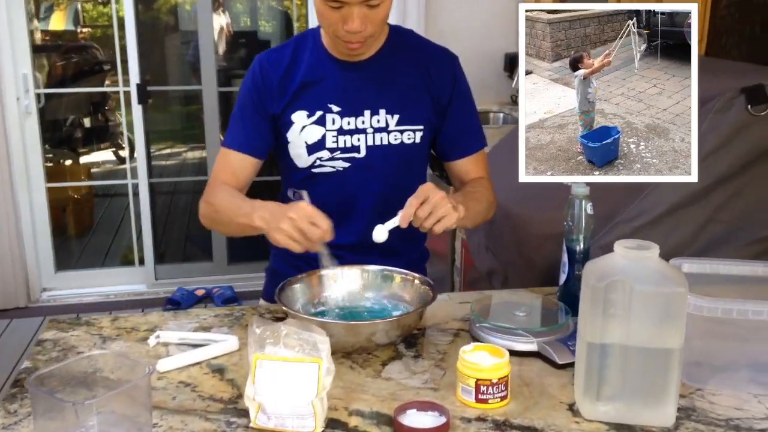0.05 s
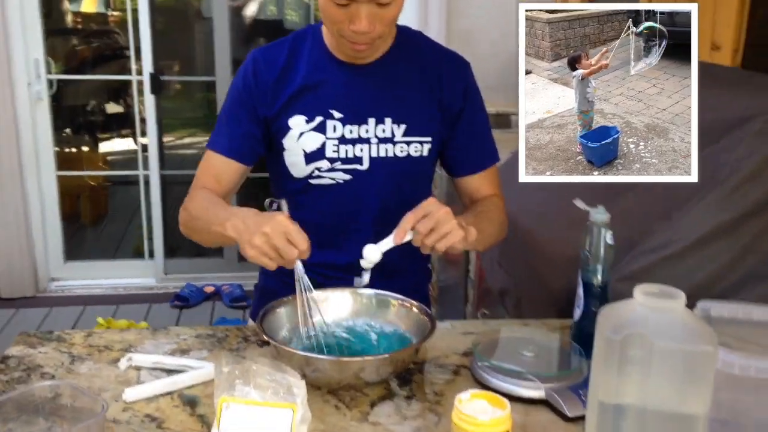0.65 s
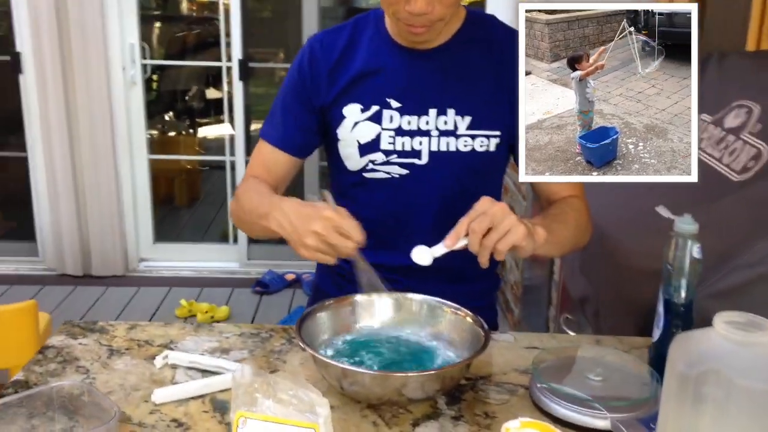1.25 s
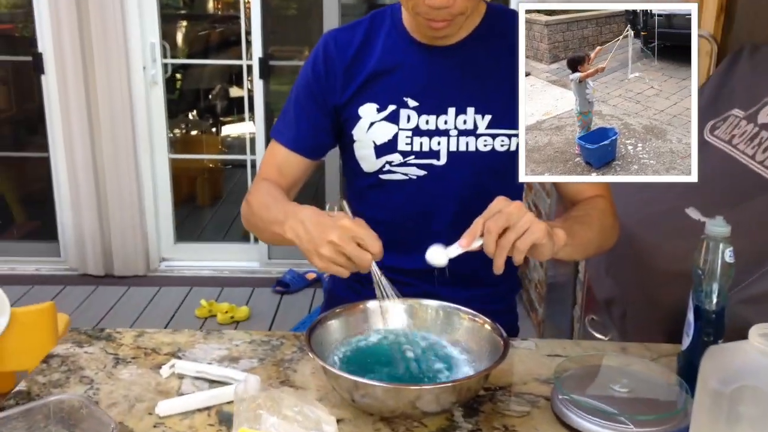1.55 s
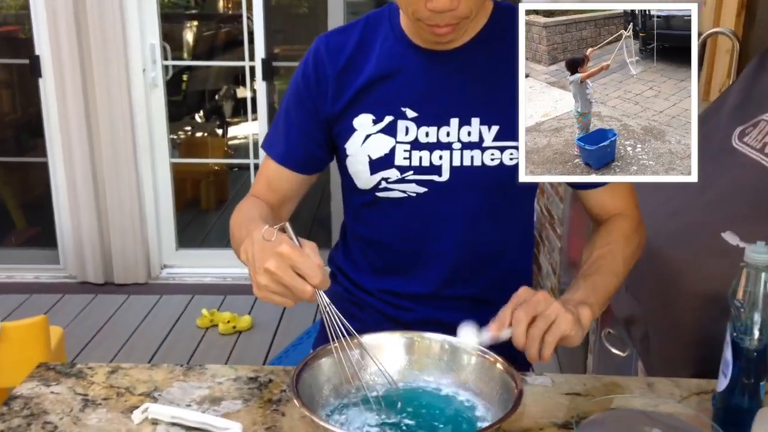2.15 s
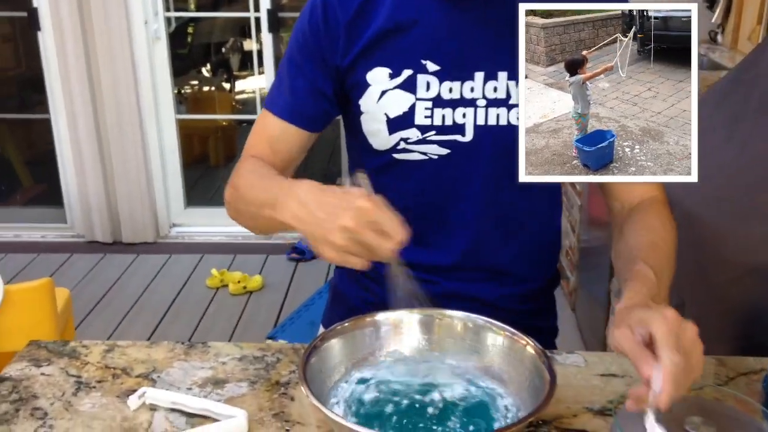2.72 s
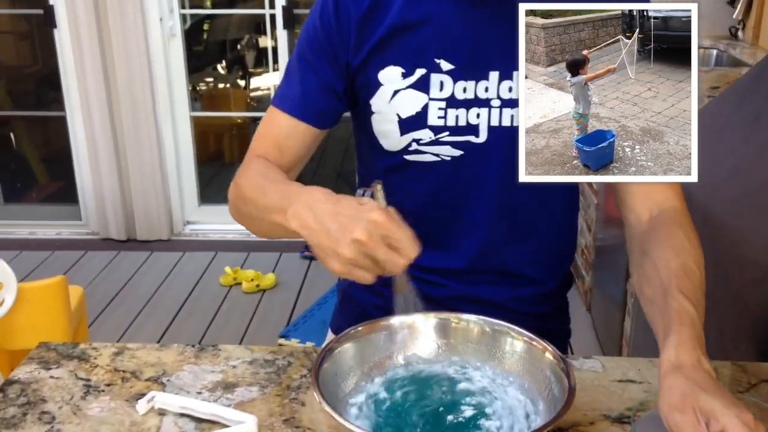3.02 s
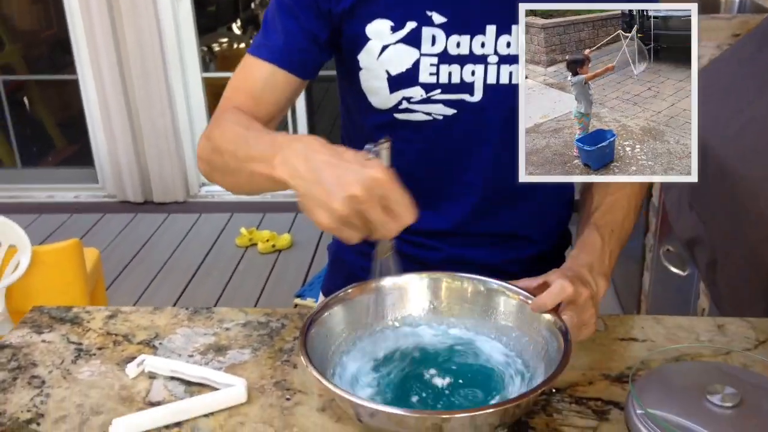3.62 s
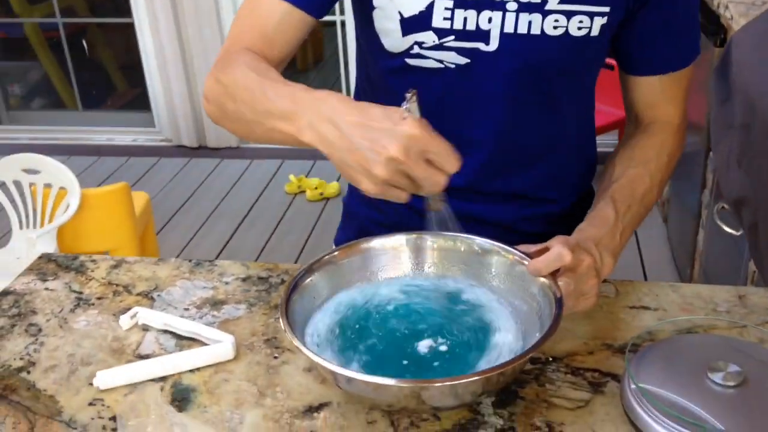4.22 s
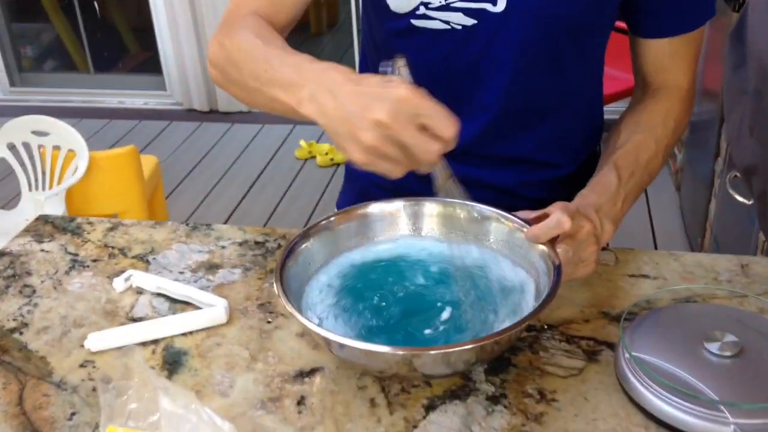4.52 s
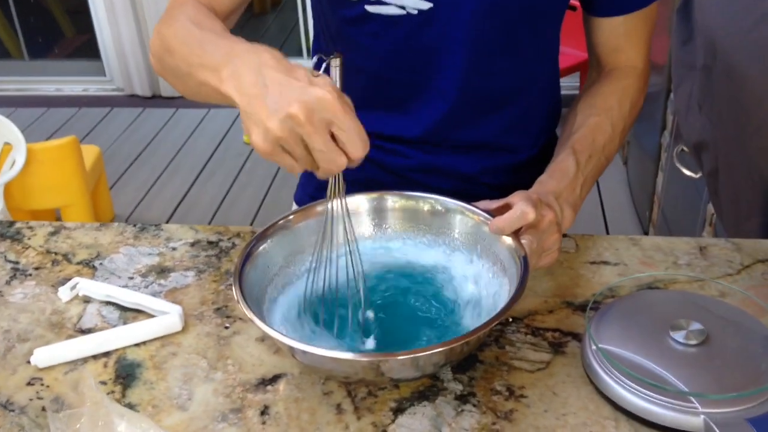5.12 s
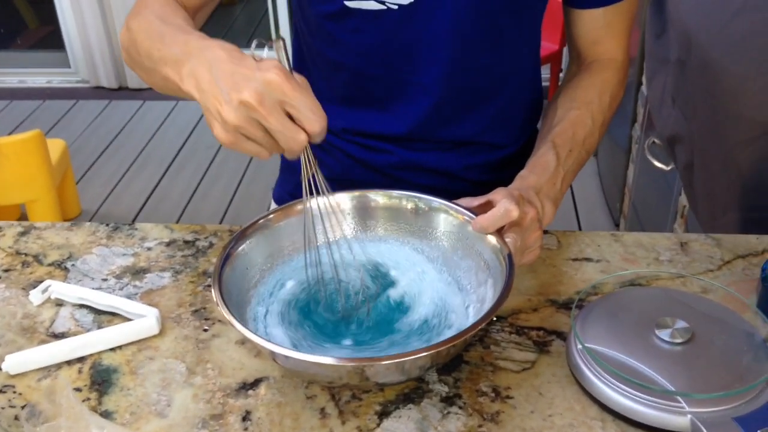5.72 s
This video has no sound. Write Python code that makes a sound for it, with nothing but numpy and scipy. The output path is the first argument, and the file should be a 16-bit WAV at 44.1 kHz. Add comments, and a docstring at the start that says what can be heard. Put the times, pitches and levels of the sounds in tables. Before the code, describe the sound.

A wire whisk beats soapy liquid in a steel bowl, clinking and gurgling, with a pause for two ringing spoon taps on the rim.

```python
"""A wire whisk beats soap solution in a steel bowl on a stone counter, by a glass door.
It turns almost four times a second; each turn makes bubbles gurgle and foam fizz, and the wires
skid over the wall about twice. In a pause a spoon is tapped twice on the rim: the bowl rings and
rocks, and powder patters in. The whisking resumes, and soon a hand steadies the bowl and dulls
its ring. A faint rumble and hiss lie behind it all."""
import sys
import numpy as np
from scipy import signal
from scipy.fft import rfft, irfft, next_fast_len
from scipy.io import wavfile

SR = 44100
rng = np.random.default_rng(int(sys.argv[2]) if len(sys.argv) > 2 else 0)


def generate_wav(signal):
    """Clip the signal to [-1, 1] and save it as 16-bit WAV at the path in sys.argv[1]."""
    frames = np.transpose(np.atleast_2d(signal))
    scaled = np.clip(frames, -1, 1) * 32767
    pcm = np.round(scaled).astype(np.int16)
    wavfile.write(sys.argv[1], SR, pcm)


N = 262836
T = np.arange(N) / SR
AGE = np.arange(SR * 2 // 5) / SR   # seconds since a blow
HOLD_S = 3.45   # from here the free hand steadies the bowl

# Levels are relative: the functions add gains of their own. t60 is the time to fade by 60 dB.
# low rumble of the surroundings: t/s, level/dB
RUMBLE_LEVEL = [(0, -55), (0.7, -55.5), (3.2, -55), (4.0, -52), (5.2, -53.5), (5.6, -56), (5.96, -53.5)]
# its tone: f/Hz, level/dB
RUMBLE_TONE = [(20, -38), (30, -50), (45, 5), (90, 0.5), (150, -3), (300, -12.5), (900, -23.5), (2500, -57),
               (5000, -47), (15000, -50)]
# high hiss of the surroundings: t/s, level/dB
HISS_LEVEL = [(0, -57), (1.0, -61.5), (2.0, -59), (2.6, -58.5), (3.5, -52.5), (4.5, -53), (5.2, -51.5),
              (5.65, -54), (5.96, -49.5)]
# its tone: f/Hz, level/dB
HISS_TONE = [(3500, -37), (5000, -6), (6100, 1), (7400, 2), (8600, 1), (10000, -12), (13000, -16),
             (16000, -34)]
# a lower hiss that comes and goes: t/s, level/dB
LOW_HISS_LEVEL = [(0, -58), (1.0, -65.5), (1.4, -59.5), (1.7, -60), (2.05, -57.5), (2.5, -52.5),
                  (2.95, -60.5), (4.0, -56.5), (5.0, -54), (5.6, -70.5), (5.96, -60)]
# its tone: f/Hz, level/dB
LOW_HISS_TONE = [(900, -5.5), (2100, 0), (2800, 3.5), (3500, 1), (4600, -2.5), (5500, -8), (9000, -39)]
# turns of the whisk through the liquid: t/s, length/s, gurgle level/dB, foam level/dB
TURNS = [(0, 0.085, -67, -51.5), (0.174, 0.17, -56, -51), (0.457, 0.17, -59, -54.5),
         (0.748, 0.095, -40.5, -53.5), (0.964, .12, -49, -55), (1.212, 0.13, -47.5, -54.5),
         (1.48, 0.087, -40, -52), (1.688, .15, -58, -57), (2.689, 0.21, -51.5, -47.5),
         (3.047, .2, -45, -53.5), (3.343, 0.19, -49.5, -49), (3.6, 0.079, -60, -56),
         (3.756, 0.17, -56, -56), (3.993, 0.23, -47, -55), (4.237, .21, -44.5, -53),
         (4.492, 0.17, -44, -52), (4.701, 0.16, -46.5, -57), (5.012, 0.14, -46, -58),
         (5.275, 0.13, -43.5, -54.5), (5.719, 0.043, -53, -67), (5.9, .06, -51, -70)]
# tone of bursting foam: f/Hz, level/dB
FOAM_TONE = [(2000, -7.5), (4500, -13), (6500, 0.5), (9000, 2), (12000, -2.5), (15500, -1.5)]
# how long the room echoes: f/Hz, t60/s
ROOM_DECAY = [(200, 0.33), (600, 0.14), (2000, 0.11), (6000, 0.2), (14000, 0.026)]
# wires hit the bowl: t/s, skid length/s, level/dB, thud/dB, brightness/dB (last two added to level)
CLINKS = [(.169, 0.014, -34.5, -6, -0.5), (.247, .008, -39.5, -8.5, 0.5), (.459, 0.015, -38, -1.5, 3.5),
          (.542, .008, -41.5, -3, -2.5), (.745, 0.014, -32, -4, -5), (0.8193, 0.0027, -35, -7.5, -1),
          (.966, .011, -40, 3, 1.5), (1.074, 0.0029, -36.5, -8, -4), (1.203, .008, -40, 1, -2),
          (1.244, .004, -41, -20, 0), (1.3, .012, -36, -7, -3.5), (1.471, 0.0064, -44.5, 6, -3),
          (1.482, 0.0056, -29.5, -5, -1), (1.55, .013, -34, -6, 2), (1.684, 0.017, -42, 1.5, 1),
          (1.829, 0.0084, -37, -10, -1), (2.67, 0.0055, -48, -11, -0.5), (2.752, 0.0035, -38.5, -13.5, -2),
          (2.8634, .002, -46, -9, 6.5), (2.878, 0.0098, -51.5, -11, 10), (3.0, 0.0049, -42.5, -6, 0.5),
          (3.081, .002, -39, -26, -1.5), (3.095, 0.014, -37, -7, 0.5), (3.2249, .002, -36.5, -6, -2.5),
          (3.3197, .0005, -35, -25, -1), (3.382, .002, -38, -29, -16), (3.418, .003, -50.5, -8, 3),
          (3.518, 0.0031, -44.5, -0.5, 9), (3.7337, 0.0051, -47, 2.5, -19), (3.7726, .002, -49, 5.5, 2),
          (3.788, 0.013, -37.5, -1, 3.5), (4.009, 0.0043, -46.5, -6, -3), (4.067, .017, -36.5, -2.5, 1.5),
          (4.256, 0.0065, -41.5, -6.5, -3), (4.33, 0.0052, -40, -3.5, -7), (4.435, .002, -48, 3.5, -6),
          (4.527, .002, -42, -5.5, -19), (4.564, 0.016, -36, -7.5, -3.5), (4.791, 0.0028, -29.5, -8.5, -7),
          (4.797, .01, -27.5, -7, 0.5), (5.024, 0.0053, -43.5, -1, -11), (5.067, 0.0081, -36.5, -7.5, -6.5),
          (5.109, .01, -45, -18, 6), (5.306, 0.0041, -38.5, -7, -19), (5.3157, 0.0044, -32.5, -4, -6.5),
          (5.743, 0.0041, -30, -12.5, -6), (5.754, .007, -36, -1, -12), (5.895, 0.0029, -29, -5.5, -12.5),
          (5.902, .001, -39.5, -8, -1)]
# tone of the wires on the free bowl: f/Hz, level/dB
FREE_TONE = [(50, -46), (140, -24), (208, -8.5), (255, -37), (295, -18), (380, -11.5), (570, -29.5),
             (690, -3.5), (830, 8), (1150, -5.5), (1950, 4.5), (2300, 1), (2750, 2), (4200, -6.5),
             (5100, -11.5), (7500, -2), (15500, -14)]
# tone of the wires on the held bowl: f/Hz, level/dB
HELD_TONE = [(50, -17), (110, -5), (380, -3.5), (520, -15.5), (850, -1.5), (1200, 0.5), (1650, -3),
             (2130, 6), (3200, -3), (4200, -4.5), (5000, -10.5), (7500, -3), (11000, -9.5), (15500, -10.5)]
# the bowl's modes, the notes it rings at: f/Hz, level/dB, t60/s when untouched
BOWL_MODES = [(207.7, -16.5, 0.77), (296.4, -12.5, 0.56), (511, -21.5, 0.39), (707, -18.5, 0.43),
              (781, -14, 0.47), (808, -15.5, 0.36), (1386, -27, 1), (1690, -19.5, 0.57), (1756, -7.5, 0.33),
              (1787, -7, 0.21), (2080, -15, 0.39), (2630, -28, 0.44), (2845, -20, 0.62), (3180, -29, 0.26),
              (3500, -26, 0.3), (4043, -20, 0.48), (5530, -16.5, 0.23), (6300, -4.5, 0.15),
              (6300, -9, 0.15), (6800, -11, 0.15), (8100, -12, 0.036), (8660, 6, 0.043)]
# tone of the free bowl's hollow boom: f/Hz, level/dB
BOOM_TONE = [(100, -32), (180, -3), (208, 5.5), (228, -13), (255, -25), (600, -55)]
# the largest single bubbles: t/s, level/dB, f/Hz
PLOPS = [(.874, -32, 2770), (1.038, -30, 3530), (1.579, -24, 2080), (2.767, -23, 2090), (3.001, -23, 2270),
         (3.098, -19, 1990), (3.17, -29, 2710), (3.253, -27, 2230), (3.892, -30.5, 2690),
         (4.332, -21.5, 2220), (4.591, -20.5, 2910), (4.756, -24.5, 2480), (4.827, -27, 636),
         (5.28, -32, 1134), (5.374, -28.5, 1485), (5.79, -27.5, 1375), (5.946, -23.5, 1280)]
# spoon taps on the rim: t/s, strike level/dB, ring level/dB
TAPS = [(2.1141, -24, -28), (2.3103, -23.5, -23.5)]
# tone of a tap: f/Hz, level/dB
SPOON_TONE = [(400, -32), (1300, -16), (2800, -3.5), (3400, -13), (4100, -3.5), (4900, -16), (6400, 0.5),
              (7600, -7), (8800, 0.5), (10600, -16.5), (14000, -8), (16000, -21)]
# the bowl's foot knocks on the counter: t/s, level/dB
KNOCKS = [(2.115, -39.5), (2.312, -36), (2.3393, -34), (2.352, -44), (2.367, -42.5), (2.394, -45),
          (2.668, -47), (3.735, -50.5), (3.79, -62), (5.745, -42.5), (5.896, -52)]
# tone of a knock: f/Hz, level/dB
KNOCK_TONE = [(25, -45), (60, -4), (95, 2.5), (200, 2), (250, -3), (330, 2.5), (520, -6), (850, -5.5),
              (1300, -13), (4000, -21.5)]
# powder falling from the spoon onto the liquid: t/s, level/dB
POWDER_LEVEL = [(2.3, -90), (2.33, -51), (2.42, -43.5), (2.47, -54), (2.55, -88)]
# the notes of one glassy tick: f/Hz, level/dB, t60/s
TICK_MODES = [(2200, -14, 0.032), (9250, -9, 0.0073), (11300, 6, 0.0038), (12000, 9, 0.0031),
              (13400, -6, .004)]


def from_db(db):
    """Turn decibels into a gain."""
    return 10 ** (np.asarray(db) / 20)


def rms_one(x):
    """Scale a sound to an average power of 1."""
    return x / np.sqrt(np.mean(x ** 2) + 1e-20)


def attack_one(x):
    """Scale a blow to a power of 1 over its first 25 ms."""
    return x / np.sqrt(np.mean(x[:SR // 40] ** 2) + 1e-20)


def in_time(points):
    """Join the points of a time table with straight lines."""
    return np.interp(T, *np.transpose(points))


def at_hz(points, hz):
    """Read a frequency table, with octaves evenly spaced."""
    f, value = np.transpose(points)
    return np.interp(np.log(np.maximum(hz, 1)), np.log(f), value)


def add(track, s, sound):
    """Mix a sound in, starting at s seconds."""
    i = max(round(s * SR), 0)
    track[i:i + len(sound)] += sound[:max(N - i, 0)]


def cut(x, hz, kind, order=3):
    """Keep the lows, the highs or a band of a sound."""
    return signal.sosfilt(signal.butter(order, hz, kind, fs=SR, output="sos"), x + 1e-18)


def colour(x, tone):
    """Shape a steady sound with a tone table; power 1."""
    size = next_fast_len(len(x))
    gains = from_db(at_hz(tone, np.arange(size // 2 + 1) * SR / size))
    return rms_one(irfft(rfft(x, size) * gains, size)[:len(x)])


def fade(t60):
    """Die away by 60 dB every t60 seconds."""
    return np.exp(-np.log(1000) * AGE / np.maximum(t60, 1e-4))


def waver(per_s):
    """A slow random drift, about 1 in size."""
    count = int(N / SR * per_s) + 2
    return rms_one(np.interp(T, np.linspace(0, N / SR, count), rng.standard_normal(count)))


def clang(tone, t60, crack_db, crack_t60, tail_db, tail_t60):
    """Countless notes blur into noise: a hard crack, a short ring, then scattered echoes."""
    envelope = fade(t60) + from_db(crack_db) * fade(crack_t60) + from_db(tail_db) * fade(tail_t60)
    return colour(rng.standard_normal(len(AGE)), tone) * envelope


def ringing(modes, ring_share=1):
    """One fading sine wave per mode; a touch cuts its ring time to ring_share of the full time."""
    return np.array([from_db(db) * np.sin(2 * np.pi * hz * AGE) * fade(t60 * ring_share)
                     for hz, db, t60 in modes])


def strike(modes, spread_db):
    """Each spot that is hit sets off its own mix of the modes."""
    strengths = from_db(spread_db * rng.standard_normal(len(modes)))
    return (strengths * rng.choice([-1, 1], len(modes))) @ modes


def background(level, tone):
    """A rumble or hiss from the surroundings, wavering a little."""
    drift_db = 1.3 * waver(per_s=12)
    return from_db(in_time(level) + drift_db) * colour(rng.standard_normal(N), tone)


def stirring(levels_db, settle_db_per_s, swell_s=0.025, sag_db_per_s=22):
    """Gain over time: each turn swells, eases as the whisk slows, then dies as the liquid settles."""
    starts, lengths, _, _ = np.transpose(TURNS)
    steps = T[::20]
    age = np.maximum(steps[:, None] - starts, 0)
    db = levels_db - sag_db_per_s * age - settle_db_per_s * np.maximum(age - lengths, 0)
    gains = np.minimum(age / swell_s, 1) * from_db(np.maximum(db, -120))
    return np.interp(T, steps, gains.max(axis=1))


def bubble(hz, cycles, rise):
    """A pocket of air rings briefly, its pitch climbing as it nears the surface."""
    samples = cycles / hz * SR
    life = np.arange(int(samples) + 2) / samples
    return np.sin(2 * np.pi * cycles * (life + rise * life ** 2 / 2)) * np.exp(-np.log(1000) * life)


def gurgle(count, centre_hz, octaves, size_db):
    """The wires drag many small bubbles under, and the soap soon stops their ringing."""
    out = np.zeros(N)
    starts = np.sort(rng.random(count)) * N / SR
    scatter = np.clip(rng.standard_normal((count, 2)), -2.2, 1.8)
    for s, (pitch, size) in zip(starts, scatter):
        ring = bubble(centre_hz * 2 ** (octaves * pitch), cycles=30, rise=.07)
        add(out, s, from_db(size_db * size) * ring)
    return rms_one(out)


def fizz(per_s, size_db):
    """Foam bursts as tiny ticks, in clumps as the wires tear through it."""
    sizes = from_db(size_db * np.minimum(rng.exponential(1, N), 4)) * rng.choice([-1, 1], N)
    clumps = from_db(2.5 * waver(per_s=130))
    bursts = rng.random(N) < per_s / SR
    return colour(clumps * sizes * bursts, FOAM_TONE)


def spray(per_s, above_hz, start_db=3, loss_db_per_s=1.5):
    """Droplets flicked off the wires patter on the steel, less so as the foam thickens."""
    return from_db(start_db - loss_db_per_s * T) * cut(fizz(per_s, size_db=6), above_hz, "high")


def rattle(per_s, size_db):
    """The wires touch the wall lightly, at random, as they slide along it."""
    sizes = from_db(size_db * np.minimum(rng.exponential(1, N), 3)) * rng.choice([-1, 1], N)
    touch = clang(HELD_TONE, t60=0.03, crack_db=8, crack_t60=0.0045, tail_db=-18, tail_t60=0.15)
    clicks = sizes * (rng.random(N) < per_s / SR)
    touches = signal.fftconvolve(clicks, touch)[:N]
    return rms_one(cut(touches, 6200, "high", order=1))


def with_echoes(x, echo_db, build_s):
    """A sound plus its echoes from counter, door and wall; the highest pitches die first."""
    edges_hz, tail = np.geomspace(70, 17000, 9), 0
    for low, high in zip(edges_hz, edges_hz[1:]):
        band = cut(rng.standard_normal(len(AGE)), [low, high], "band", order=2)
        tail += band * fade(at_hz(ROOM_DECAY, np.sqrt(low * high)))
    tail *= 1 - np.exp(-AGE / build_s)
    return x + from_db(echo_db) * signal.fftconvolve(x, tail / np.linalg.norm(tail))[:N]


def skid(length, wires_per_s, uneven_db, first_db):
    """The wires land one after another, as a run of uneven clicks."""
    jitter, sizes_db = rng.random(32), uneven_db * rng.standard_normal(32)
    sizes_db[0] = first_db
    count = int(np.clip(1 + length * wires_per_s, 1, 32))
    places = (np.arange(count) + jitter[:count] - jitter[0]) / count
    clicks = np.zeros(int(length * SR) + 2)
    clicks[(places * (len(clicks) - 1)).astype(int)] = from_db(sizes_db[:count])
    return clicks


def whisk(free_ring_db, held_ring_db, low_hz, high_hz):
    """Skidding wires ring the whisk and the bowl; a heavy hit thuds, a hard one is bright."""
    out, modes = np.zeros(N), ringing(BOWL_MODES, ring_share=0.65)
    bands = [(low_hz, "low"), ([low_hz, high_hz], "band"), (high_hz, "high")]
    for s, length, db, thud_db, bright_db in CLINKS:
        tone, ring_db = (FREE_TONE, free_ring_db) if s < HOLD_S else (HELD_TONE, held_ring_db)
        hit = clang(tone, t60=0.077, crack_db=3, crack_t60=0.0047, tail_db=-9, tail_t60=0.23)
        hit += from_db(ring_db) * strike(modes, spread_db=4.5)
        clink = signal.fftconvolve(hit, skid(length, wires_per_s=400, uneven_db=3.5, first_db=-0.5))
        low, middle, high = (attack_one(cut(clink, hz, kind)) for hz, kind in bands)
        # the middle band is flipped, as neighbouring bands are out of step where they meet
        add(out, s, from_db(db) * (from_db(thud_db) * low - middle + from_db(bright_db) * high))
    return out


def boom(below_thud_db):
    """Until the bowl is held, each clink also sets its lowest note booming."""
    out = np.zeros(N)
    for s, _, db, thud_db, _ in CLINKS:
        if s < HOLD_S:
            hollow = colour(rng.standard_normal(len(AGE)), BOOM_TONE)
            envelope = fade(0.29) * (1 - fade(0.069))
            add(out, s, from_db(db + thud_db - below_thud_db) * hollow * envelope)
    return out


def plops(gain_db):
    """Now and then a larger pocket of air closes and rings."""
    out = np.zeros(N)
    for s, db, hz in PLOPS:
        add(out, s, from_db(db + gain_db) * bubble(hz, cycles=52, rise=.08))
    return out


def spoon():
    """A bright tap on the rim lets the bowl ring freely."""
    out, modes = np.zeros(N), ringing(BOWL_MODES, ring_share=0.98)
    for s, strike_db, ring_db in TAPS:
        tap = clang(SPOON_TONE, t60=0.068, crack_db=9, crack_t60=0.018, tail_db=-2, tail_t60=0.15)
        add(out, s, from_db(strike_db) * attack_one(tap))
        add(out, s, from_db(ring_db) * strike(modes, spread_db=3.5))
    return out


def rocking():
    """The filled bowl tips and settles on the stone with dull knocks."""
    out = np.zeros(N)
    for s, db in KNOCKS:
        knock = clang(KNOCK_TONE, t60=0.14, crack_db=-13, crack_t60=0.022, tail_db=-7.5, tail_t60=0.78)
        add(out, s, from_db(db) * attack_one(knock))
    return out


def powder(per_s):
    """Fine grains land as a short, bright sprinkle."""
    return from_db(in_time(POWDER_LEVEL)) * fizz(per_s, size_db=3)


def tick(at_s, level_db):
    """One very hard, brief contact rings a few high notes."""
    out = np.zeros(N)
    add(out, at_s, from_db(level_db) * attack_one(sum(ringing(TICK_MODES))))
    return out


def scene():
    """Mix metal, liquid and foam over the background, in one channel."""
    _, _, gurgle_db, foam_db = np.transpose(TURNS)
    churn = stirring(gurgle_db, settle_db_per_s=139)
    swish = stirring(foam_db, settle_db_per_s=260)
    # a little sound is left between turns; the fizz grows as foam builds up
    gurgle_rest, foam_rest = from_db(-70.5), from_db(-75 + 2 * T)
    metal = whisk(free_ring_db=-10.5, held_ring_db=-16.5, low_hz=1074, high_hz=5540)
    metal += spoon() + rocking() + boom(below_thud_db=10.5)
    metal += from_db(-1) * swish * rattle(per_s=190, size_db=6)
    bubbles = gurgle(count=2100, centre_hz=2105, octaves=0.5, size_db=5)
    liquid = from_db(-2.5) * (churn + gurgle_rest) * bubbles + plops(gain_db=-4)
    foam = from_db(2.5) * (swish + foam_rest) * fizz(per_s=8000, size_db=6)
    foam += swish * spray(per_s=2500, above_hz=9000)
    rumble = background(RUMBLE_LEVEL, RUMBLE_TONE)
    hiss = background(HISS_LEVEL, HISS_TONE) + background(LOW_HISS_LEVEL, LOW_HISS_TONE)
    small_sounds = liquid + foam + powder(per_s=4100) + tick(at_s=3.3196, level_db=-26.5)
    return (metal + with_echoes(small_sounds, echo_db=-6, build_s=0.0013) + rumble + hiss)[None]


def record(dry):
    """Steeply cut everything above 15500 Hz."""
    return signal.sosfilt(signal.ellip(10, .2, 70, 15500, fs=SR, output="sos"), dry)


dry = scene()
out = record(dry)
generate_wav(out)
```